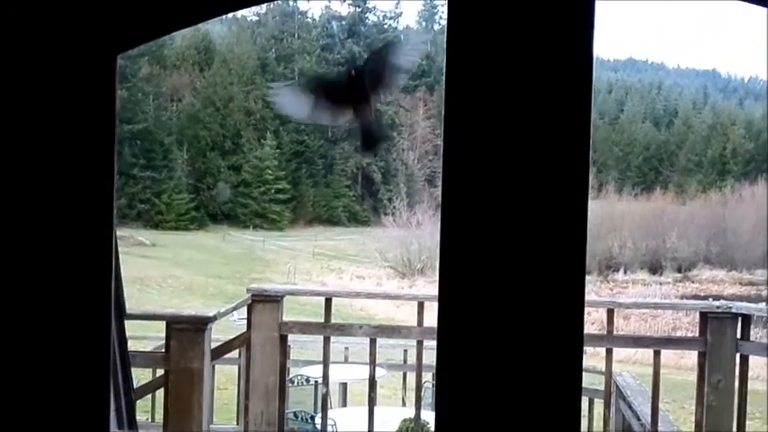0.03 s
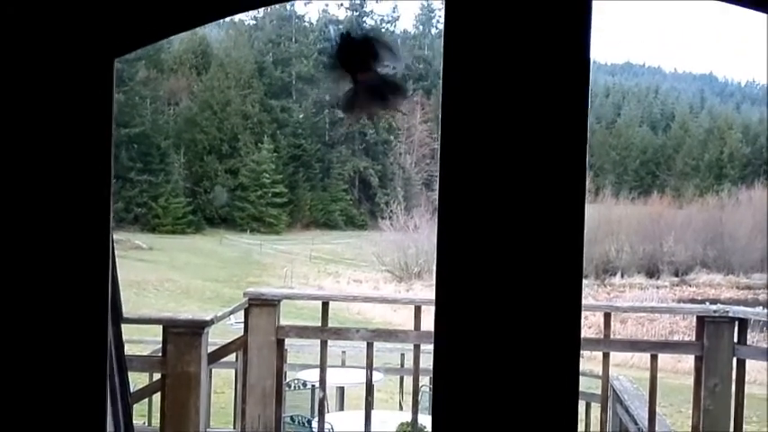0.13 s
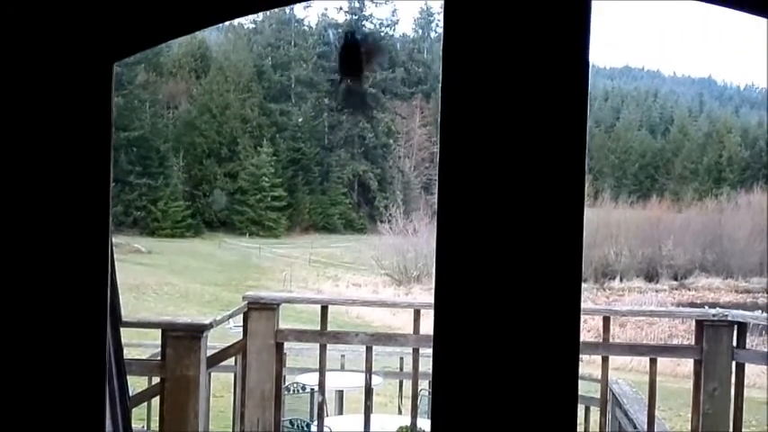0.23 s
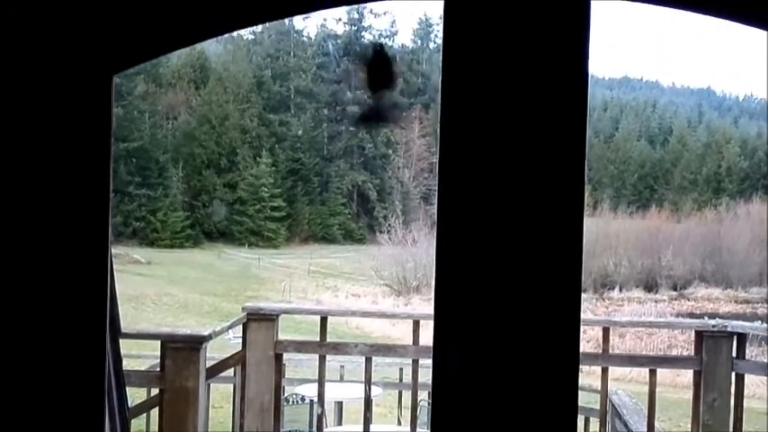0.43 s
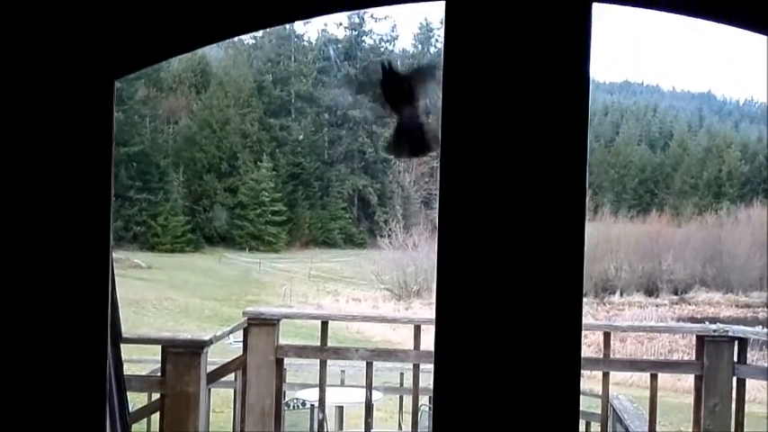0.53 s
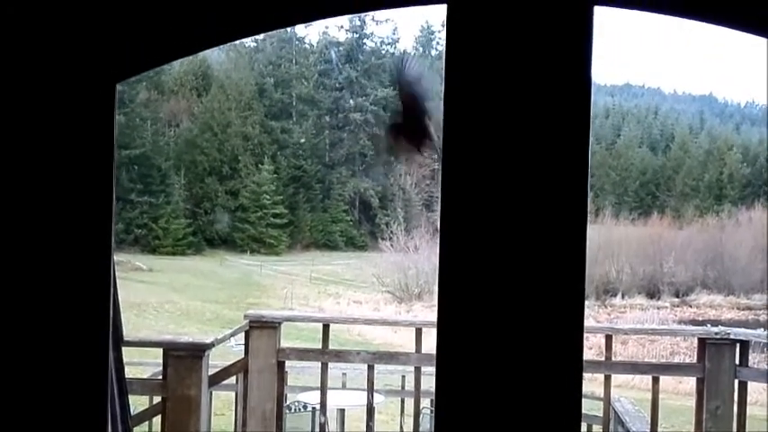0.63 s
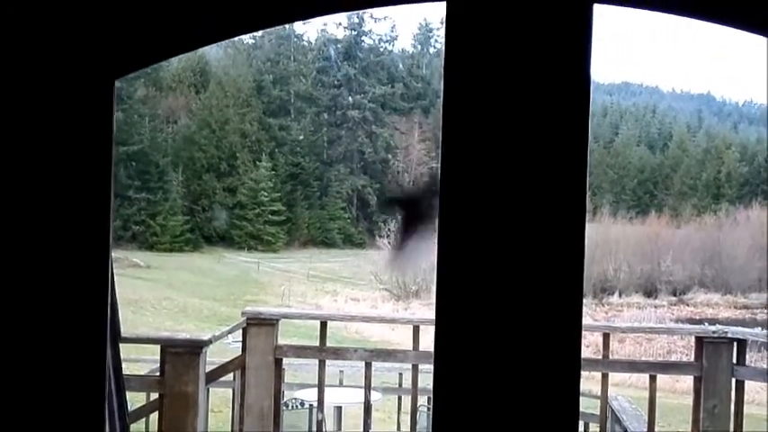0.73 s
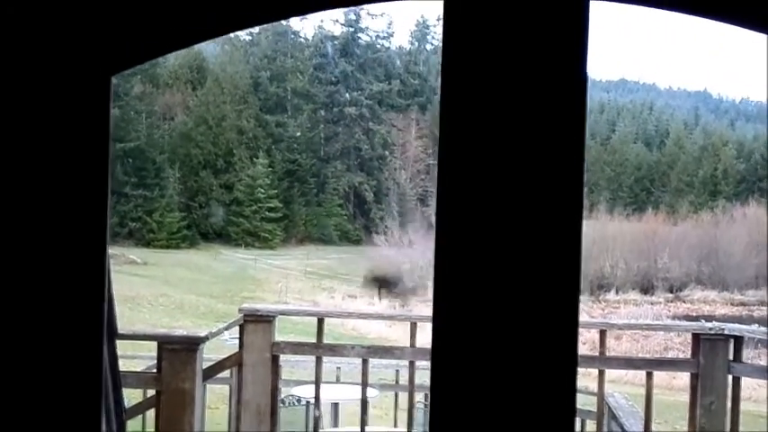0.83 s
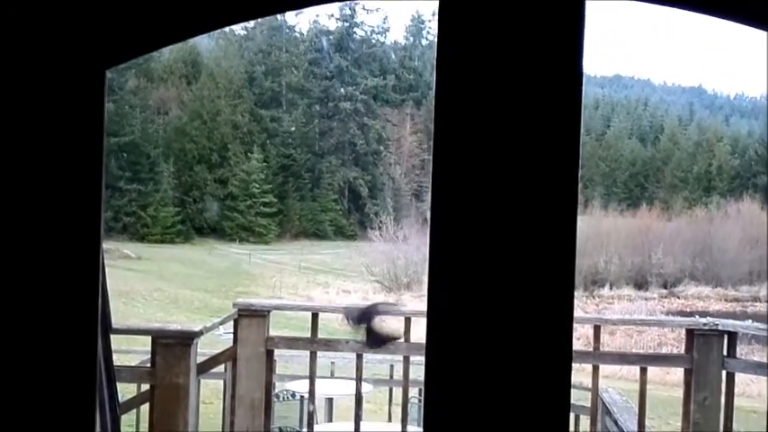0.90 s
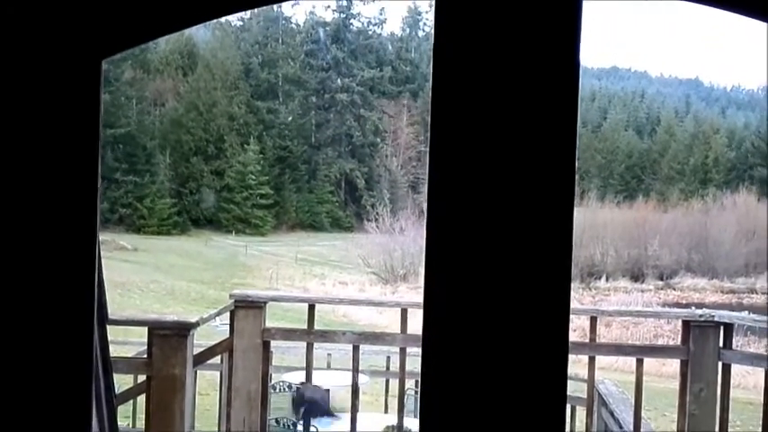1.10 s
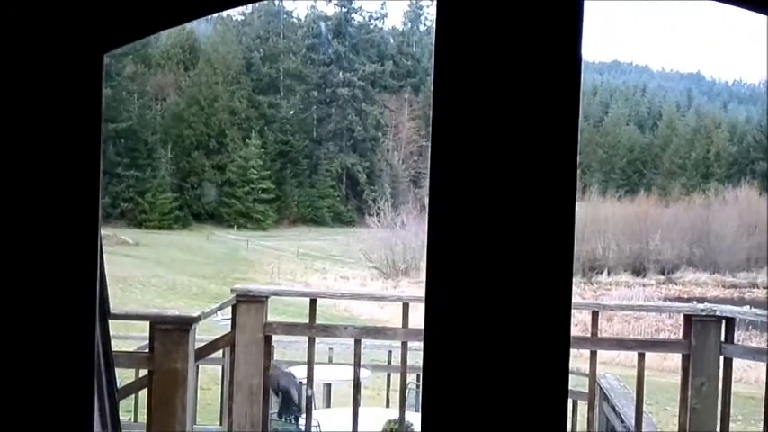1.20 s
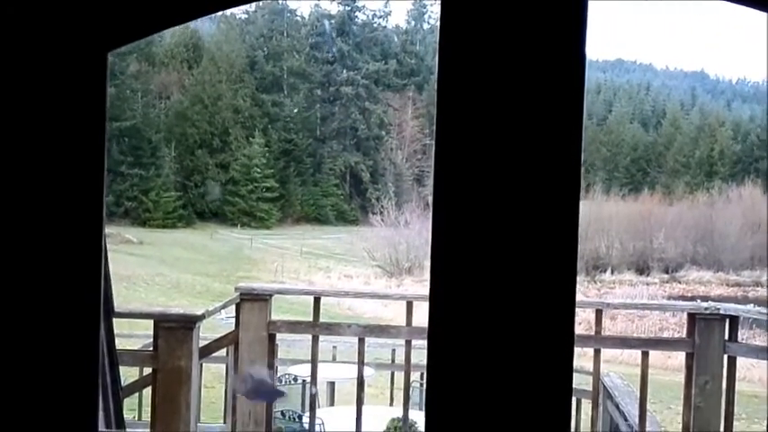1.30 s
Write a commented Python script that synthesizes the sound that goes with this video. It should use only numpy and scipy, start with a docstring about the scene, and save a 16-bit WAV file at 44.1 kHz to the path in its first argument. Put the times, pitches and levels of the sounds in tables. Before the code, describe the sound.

Two dull knocks of a bird hitting window glass, with light wing flicks.

```python
"""A bird flies at a window; one microphone stands inside a quiet room, across the glass from it.
From the start the room hisses softly and an appliance hums on the mains. Wing tips graze and flick
the pane. At 0.2 s the body knocks against it: bending waves carry the treble across first and the
low ring last. The bird shoves, clings and damps the glass, then flicks it again and knocks more
softly at 0.5 s. As the ring dies away, a few faint high ticks are left over the room tone."""
import sys
import numpy as np
from scipy import signal
from scipy.io import wavfile

SR = 44100
rng = np.random.default_rng(int(sys.argv[2]) if len(sys.argv) > 2 else 0)


def store_wav(level_fs):
    """Save 16-bit WAV to argv[1]."""
    pcm = np.round(np.clip(np.atleast_2d(level_fs), -1, 1) * 32767)
    wavfile.write(sys.argv[1], SR, pcm.T.astype(np.int16))


N = 59535
T = np.arange(N) / SR

# Room air at the microphone. Each row: frequency in Hz, relative noise density in dB.
AIR_SPECTRUM = [(20, 7.5), (60, -4), (200, 0.5), (400, 1), (700, 0.5), (1200, -5), (1700, -5.5),
                (3000, -11.5), (7000, -13), (10500, -12), (12700, -9), (14000, -21), (16000, -6)]
# Resonances of the appliance's casing. Each row: centre in Hz, width in Hz, level in dB.
CASING_RESONANCES = [(377, 73, -63.5), (504, 21, -55), (552.3, 9.7, -63), (653, 17, -73), (1085, 140, -67),
                     (1226, 8, -69)]
# The appliance's hum. Each row: multiple of the mains frequency, level in dB.
MAINS_HARMONICS = [(1, -69), (5, -64.5), (6, -62.5), (7, -64), (8, -60), (11, -64)]
# Faint high ticks. Each row: start in seconds, level in dB.
HIGH_TICKS = [(0.809, -54), (0.852, -54), (0.940, -52.5), (1.127, -53), (1.262, -55.5)]

# Wings brushing the far side of the glass. Each row: start in seconds, level in dB, pitch in Hz,
# t60 (time to fall 60 dB) in seconds, roughness from 0 to 1.
WING_GRAZES = [(0.029, -52.5, 133, 0.43, 0.03), (0.13, -43.5, 660, 0.18, 1), (0.126, -44, 5020, 0.11, 0.3),
               (0.14, -39, 162, 0.25, 0.07), (0.124, -44, 245, 0.43, 0.3), (0.164, -50, 3700, 0.5, 0.4),
               (0.462, -48.5, 1094, 0.24, 0.94)]
# Wing tips striking it. Each row: start in seconds, level in dB, tilt below 10 kHz in dB per octave,
# level of the pane's answer in dB.
WING_FLICKS = [(0.103, -48, -0.5, -67), (0.1174, -35.5, -1.5, -36), (0.148, -61, 14, -58),
               (0.256, -47, 2, -57), (0.452, -43, 2, -55), (0.548, -41.5, 9, -68), (0.563, -48, -2.5, -58)]
# A flick and the pane's low answer. Each row: frequency in Hz, relative noise density in dB.
FLICK_SPECTRUM = [(70, -29), (200, 2), (1000, -6.5), (2500, -5), (4000, -5.5), (5800, -2.5), (8500, -7),
                  (12000, -1.5), (16000, -17)]
ANSWER_SPECTRUM = [(70, -35), (160, 5), (260, 8), (380, 2), (620, 10), (850, -5), (1150, -5.5), (2000, -17),
                   (5000, -16.5)]
# Their decays. Each row: frequency in Hz, t60 in seconds.
FLICK_DECAY = [(1000, 0.23), (4000, 0.3), (7000, 0.049), (12000, 0.049)]
ANSWER_DECAY = [(160, 0.69), (1000, 0.61)]

# The pane's modes. Each entry: pitch in Hz in the first list, t60 in seconds in the second.
MODE_HZ = [175, 231, 258, 305, 343, 412, 447, 526, 540, 610, 657, 698, 800, 884, 978, 1013, 1120, 1195,
           1437, 3370, 3760]
MODE_T60 = [0.17, 0.41, 0.25, 0.23, 0.44, 0.2, 0.18, 0.41, 0.25, 0.063, 0.31, 0.19, 0.104, 0.092, 0.25,
            0.23, 0.21, 0.16, 0.21, 0.24, 0.24]
# Where the knocks land. Each row: one spot's relative level in dB for every mode.
SPOT_MODE_DB = [
    [-5.5, -12, -11.5, -4, -9, 3, -5, -5, 2.8, -15, -3, 1.5, 0, -1, -12, -10.5, -12, -12, -20.5, -16, -17],
    [-9.5, -11.5, -15, 0, -16, -0.5, -10, -20, 0.69, -14, -7, -17, -30, -9.5, -28, -14.5, -33, -13.5, -16.5,
     -20.5, -35],
]
# Gaps between resonances, where the pane hardly sounds. Each entry: centre in Hz.
PANE_GAPS_HZ = [203, 487, 838, 935]
# Soft shoves on the glass. Each row: start in seconds, level in dB, Hz above which little is stirred.
BODY_PUSHES = [(0.2409, -26.5, 187), (0.2885, -33.5, 475)]
# Jolts of the pane. Each row: start in seconds, level in dB, pitch in Hz.
BODY_JOLTS = [(0.1315, -34.5, 624), (0.2048, -24, 480), (0.2099, -18.5, 391), (0.2171, -15.5, 675),
              (0.2241, -21.5, 686), (0.2567, -21, 370), (0.2625, -21, 468), (0.326, -34, 353),
              (0.516, -32.5, 390), (0.5214, -31, 654), (0.5367, -32, 786), (0.5532, -24.5, 554)]
# The body hitting the window. Each row: start in seconds, levels of ring, thud and slap in dB,
# swell time and travel time at 1 kHz in seconds.
BODY_KNOCKS = [(0.2048, -31.5, -22.5, -28.5, 0.0065, 0.002946), (0.5156, -34.5, -31, -34.5, 0.015, 0.00413)]
# The dull thud of pane, frame and room, and the slap of breast feathers on the glass.
# Each row: frequency in Hz, relative noise density in dB.
THUD_SPECTRUM = [(30, -46), (60, -12), (110, -2), (170, 3.5), (260, 5.5), (450, 8.5), (700, 3.5),
                 (1000, -0.5), (1500, -40), (3000, -59)]
SLAP_SPECTRUM = [(60, -20), (300, -11), (1200, -1.5), (2400, -1.5), (3800, -5), (5000, -6.5), (6500, -14.5),
                 (9000, -26), (12000, -22), (16000, -35)]
# Their decays. Each row: frequency in Hz, t60 in seconds.
THUD_DECAY = [(150, 0.6), (400, 0.35), (1000, 0.34)]
SLAP_DECAY = [(1500, 0.17), (3700, 0.27), (5500, 0.13), (10000, 0.053)]


def from_db(db):
    """Decibels to gain."""
    return 10 ** (np.asarray(db) / 20)


def at_hz(points, hz):
    """Read a table on a log-frequency axis."""
    freqs, values = np.transpose(points)
    return np.interp(np.log(hz), np.log(freqs), values)


def noise_bands():
    """Third-octave bands of noise as (centre Hz, signal)."""
    edges = 20 * 2 ** (np.arange(30) / 3)
    white = rng.standard_normal((2, N + SR // 2))
    for k, (low, high) in enumerate(zip(edges, edges[1:])):
        bandpass = signal.butter(2, [low, high], "band", fs=SR, output="sos")
        yield np.sqrt(low * high), signal.sosfilt(bandpass, white[k % 2])[-N:]


def resonant_noise(hz, width_hz):
    """Noise through one resonance, at an rms of 1."""
    radius = np.exp(-np.pi * width_hz / SR)
    feedback = [1, -2 * radius * np.cos(2 * np.pi * hz / SR), radius * radius]
    noise = signal.lfilter([1, 0, -1], feedback, rng.standard_normal(N + SR))[-N:]
    return noise / noise.std()


def envelope(start, rise, t60, hold=0):
    """Smooth rise, hold and exponential decay, all timed in seconds."""
    age = T - start
    attack = np.sin(np.pi / 2 * np.clip(age / rise, 0, 1))
    return attack * from_db(-60 * np.maximum(age - rise - hold, 0) / t60)


def room_tone(air_db=-43, mains_hz=60, waver=0.13):
    """Indoors with the microphone: even hiss, an appliance's droning casing and its wavering hum."""
    air = sum(band * from_db(air_db + at_hz(AIR_SPECTRUM, hz)) for hz, band in noise_bands())
    drone = sum(from_db(db) * resonant_noise(hz, width) for hz, width, db in CASING_RESONANCES)
    hum = np.zeros(N)
    for multiple, db in MAINS_HARMONICS:
        hz = multiple * mains_hz
        tone = np.sqrt(2) * np.sin(2 * np.pi * (hz * T + rng.random()))
        hum += from_db(db) * (tone + waver * resonant_noise(hz, width_hz=16))
    return air + drone + hum


def high_ticks():
    """Something ticks faintly, high in the treble."""
    bursts = sum(from_db(db) * envelope(start, rise=0.0023, t60=0.03) for start, db in HIGH_TICKS)
    return bursts * resonant_noise(11360, width_hz=1500)


def lateness(hz):
    """Travel time of a bending wave in the glass relative to one at 1 kHz."""
    return np.sqrt(1000 / hz)


def pane_mode(start, hz, rise, t60, hold=0, cling_s=0.276, cling_db=-8):
    """One swelling and dying sine of the pane, damped if it began before the bird clings."""
    grip = np.clip((T - cling_s) / 0.021, 0, 1)
    damping = from_db(cling_db * (start < cling_s) * grip)
    return damping * envelope(start, rise, t60, hold) * np.sin(2 * np.pi * hz * (T - start))


def wing_grazes(rise_cycles=1.1):
    """Grazing wings ring a patch of the pane faintly, cleanly or with a scrape."""
    out = np.zeros(N)
    for start, db, hz, t60, roughness in WING_GRAZES:
        rise = rise_cycles / hz
        tone = pane_mode(start, hz, rise, t60)
        scrape = envelope(start, rise, t60) * resonant_noise(hz, width_hz=0.12 * hz)
        out += from_db(db) * ((1 - roughness) * tone + roughness * scrape)
    return out


def wing_flicks(travel_s=0.0062, rise_s=0.0064, echo_db=-17.5):
    """Stiff feathers tick on the glass, treble first; the pane answers low and the room rings on."""
    out = np.zeros(N)
    for hz, band in noise_bands():
        late = lateness(hz)
        rise = rise_s * max(late, 1)
        octaves = min(np.log2(hz / 10000), 0)
        for start, db, tilt, answer_db in WING_FLICKS:
            arrival = start + travel_s * late
            direct = envelope(arrival, rise, at_hz(FLICK_DECAY, hz))
            echo = from_db(echo_db) * envelope(arrival, rise, t60=0.63)
            flick = from_db(db + at_hz(FLICK_SPECTRUM, hz) + tilt * octaves) * (direct + echo)
            answer = envelope(arrival, rise, at_hz(ANSWER_DECAY, hz))
            answer *= from_db(answer_db + at_hz(ANSWER_SPECTRUM, hz))
            out += band * np.hypot(flick, answer)  # the two add in power
    return out


def trim_feathers(feathers, low_hz=70.4, high_hz=13300):
    """The flicks are thinned in the deep bass, and everything above about 13 kHz is cut steeply."""
    thinned = signal.sosfilt(signal.butter(2, low_hz, "high", fs=SR, output="sos"), feathers)
    return signal.sosfilt(signal.butter(12, high_hz, fs=SR, output="sos"), thinned)


def push_off(rise_cycles=1.8):
    """The body sinks in and shoves away at the spot of the first knock, ringing the low modes again."""
    out = np.zeros(N)
    for start, push_db, corner_hz in BODY_PUSHES:
        for hz, db, t60 in zip(MODE_HZ, SPOT_MODE_DB[0], MODE_T60):
            gain = from_db(push_db + db) / (1 + (hz / corner_hz) ** 4)
            out += gain * pane_mode(start, hz, rise_cycles / hz, t60)
    return out


def body_jolts(decay_cycles=7):
    """The pane jolts for a few cycles as the body lands, pushes off and lets go."""
    return sum(from_db(db) * pane_mode(start, hz, rise=1 / hz, t60=decay_cycles / hz)
               for start, db, hz in BODY_JOLTS)


def knock_noise(gap_width_hz=31):
    """Each knock's dense thud and feathery slap, hollowed out between the pane's resonances."""
    out = np.zeros(N)
    for hz, band in noise_bands():
        late = lateness(hz)
        for start, _, thud_db, slap_db, swell, travel in BODY_KNOCKS:
            thud = envelope(start + travel * late, swell * late, at_hz(THUD_DECAY, hz))
            thud *= from_db(thud_db + at_hz(THUD_SPECTRUM, hz))
            slap = envelope(start, rise=0.0034, t60=at_hz(SLAP_DECAY, hz), hold=0.016)
            slap *= from_db(slap_db + at_hz(SLAP_SPECTRUM, hz))
            out += band * np.hypot(thud, slap)
    for hz in PANE_GAPS_HZ:
        out = signal.lfilter(*signal.iirnotch(hz, hz / gap_width_hz, fs=SR), out)
    return out


def knock_ring(hold_at_1khz_s=0.0093):
    """Each knock rings the pane's modes; the low ones arrive later and build up more slowly."""
    out = np.zeros(N)
    for (start, ring_db, _, _, swell, travel), spot_db in zip(BODY_KNOCKS, SPOT_MODE_DB):
        for hz, db, t60 in zip(MODE_HZ, spot_db, MODE_T60):
            late = lateness(hz)
            rise = swell * late ** 0.51
            hold = hold_at_1khz_s * min(late, 1.7) ** 1.63  # the pressing body sustains low modes longer
            out += from_db(ring_db + db) * pane_mode(start + travel * late, hz, rise, t60, hold)
    return out


def scene():
    """The bird at the pane over the room tone, in mono from indoors."""
    body = knock_ring() + knock_noise() + body_jolts() + push_off()
    flicks = trim_feathers(wing_flicks())
    return (body + flicks + high_ticks() + wing_grazes() + room_tone())[None]


def record(dry, cutoff_hz=15750):
    """The microphone's signal, with the very top cut steeply."""
    return signal.sosfilt(signal.ellip(12, .1, 80, cutoff_hz, fs=SR, output="sos"), dry)


dry = scene()
out = record(dry)
store_wav(out)
```